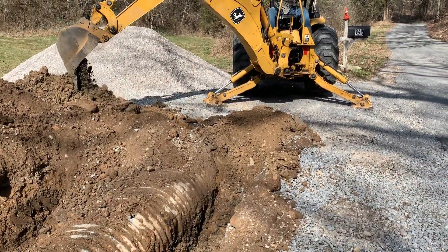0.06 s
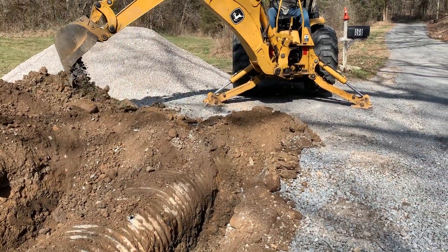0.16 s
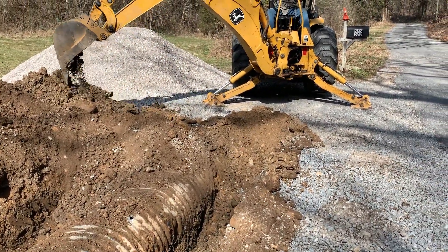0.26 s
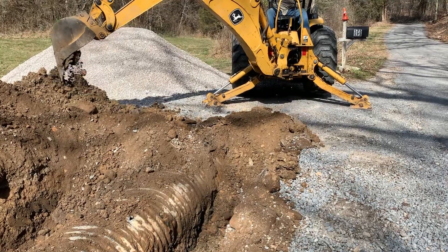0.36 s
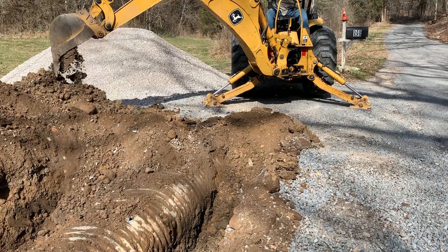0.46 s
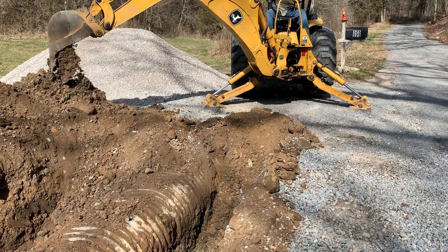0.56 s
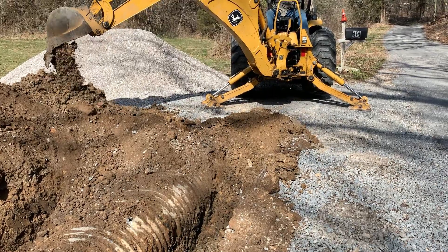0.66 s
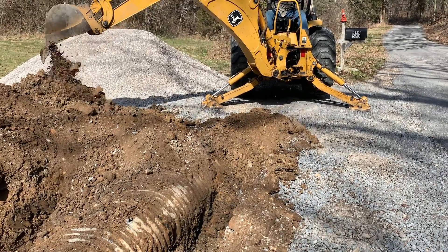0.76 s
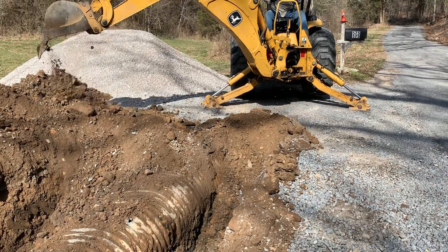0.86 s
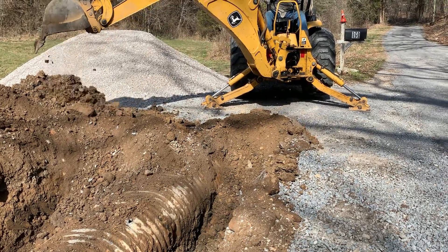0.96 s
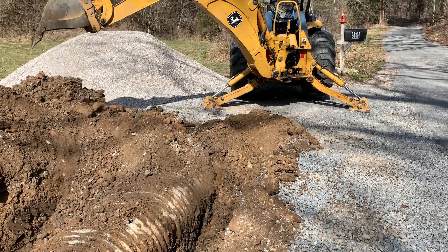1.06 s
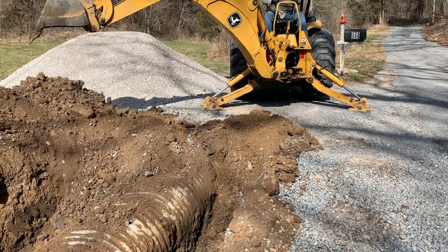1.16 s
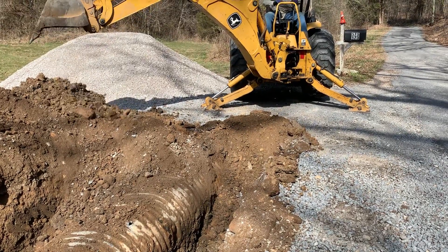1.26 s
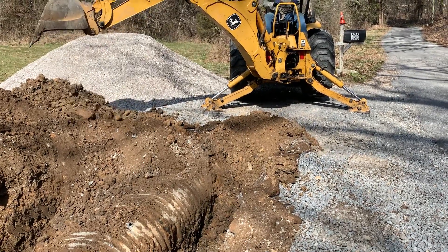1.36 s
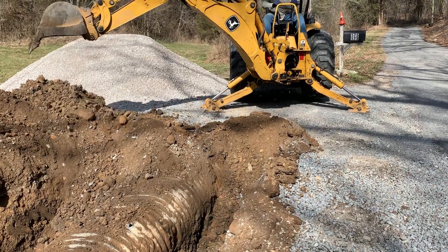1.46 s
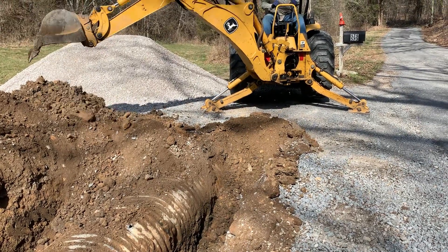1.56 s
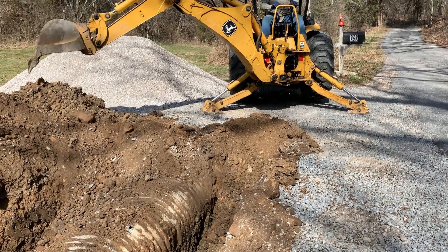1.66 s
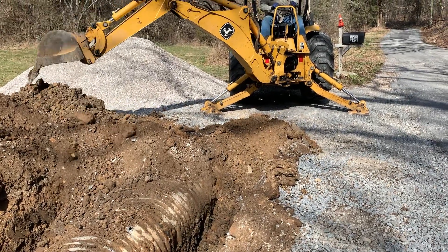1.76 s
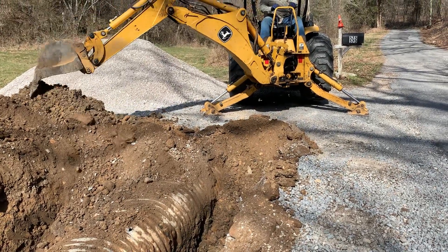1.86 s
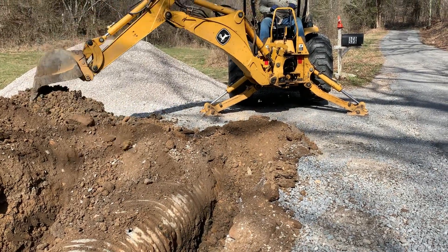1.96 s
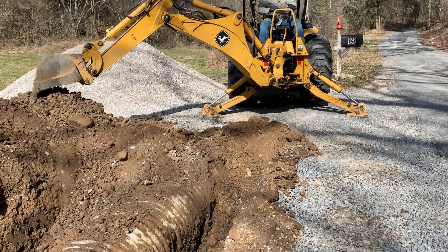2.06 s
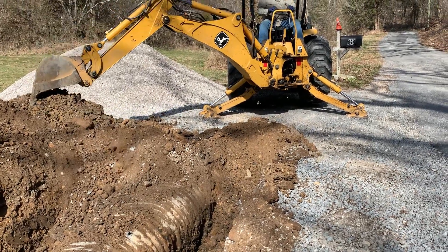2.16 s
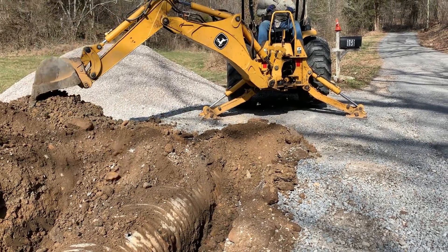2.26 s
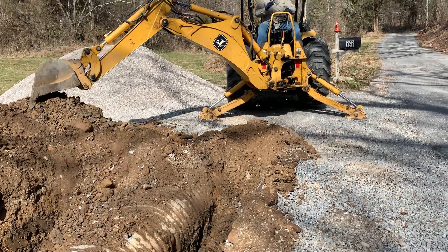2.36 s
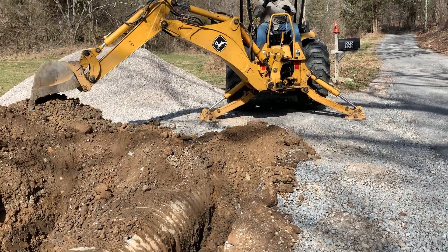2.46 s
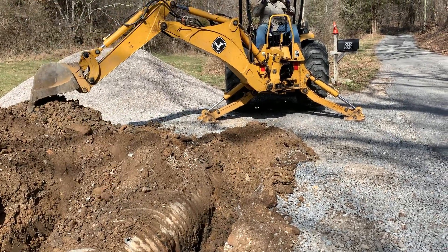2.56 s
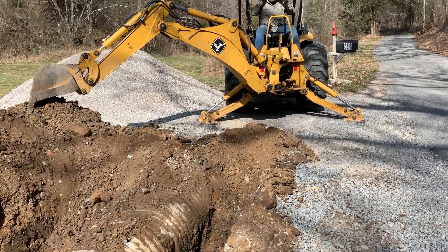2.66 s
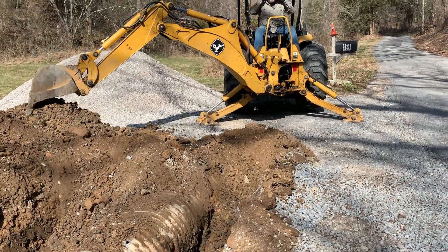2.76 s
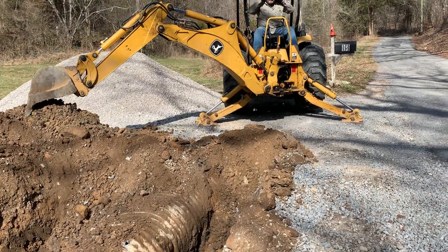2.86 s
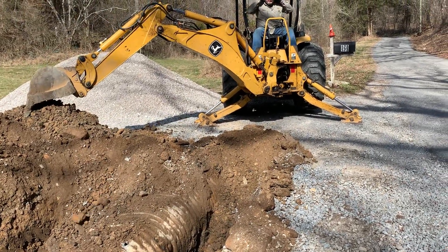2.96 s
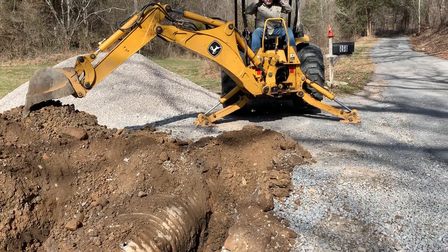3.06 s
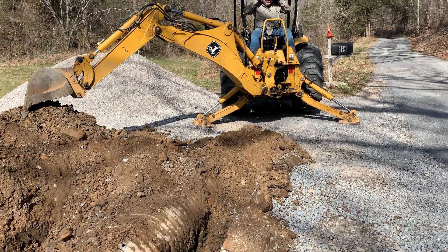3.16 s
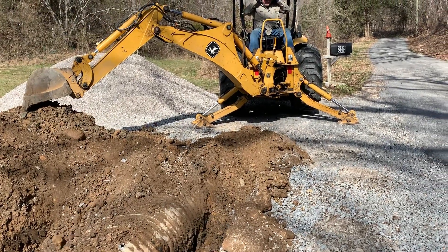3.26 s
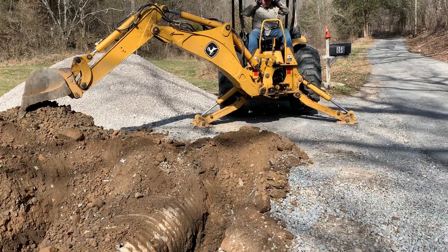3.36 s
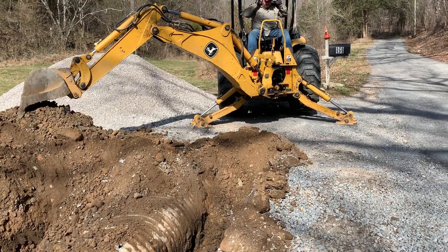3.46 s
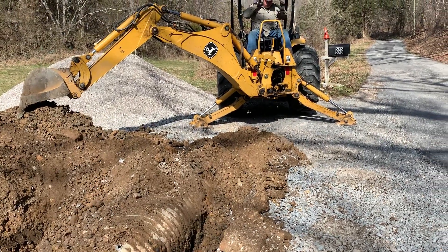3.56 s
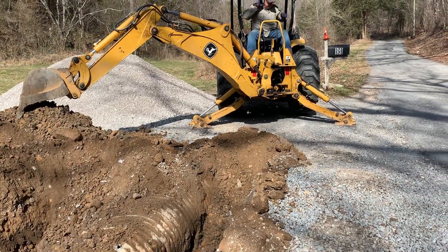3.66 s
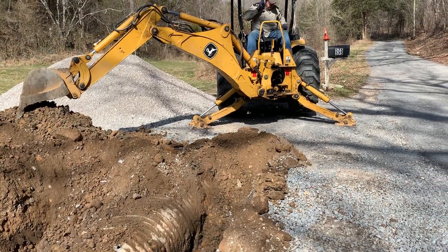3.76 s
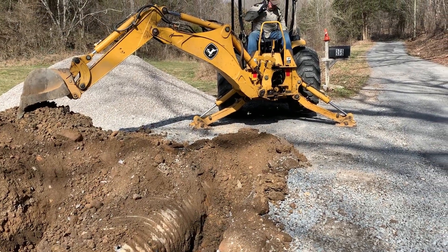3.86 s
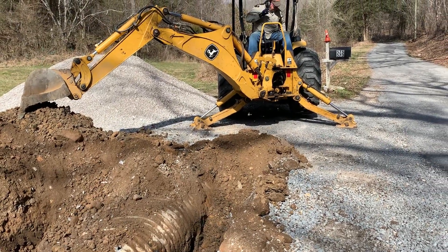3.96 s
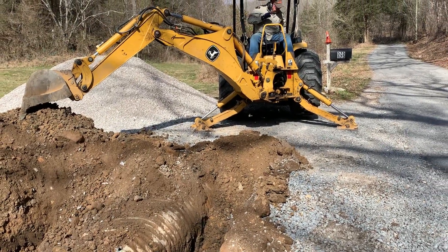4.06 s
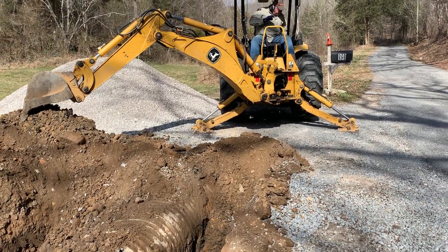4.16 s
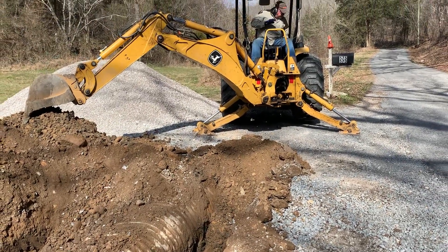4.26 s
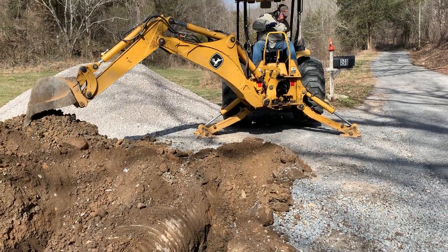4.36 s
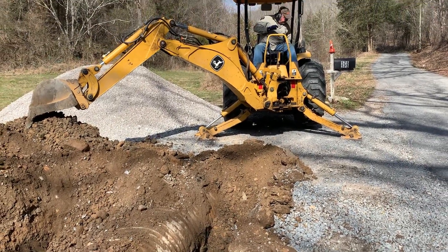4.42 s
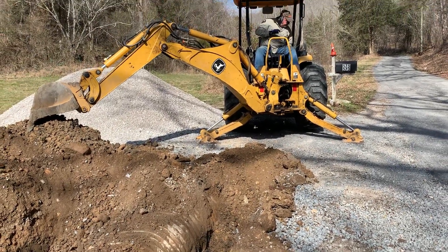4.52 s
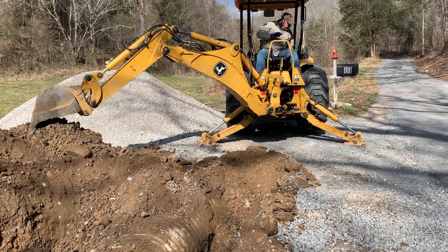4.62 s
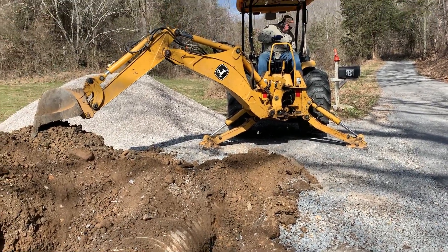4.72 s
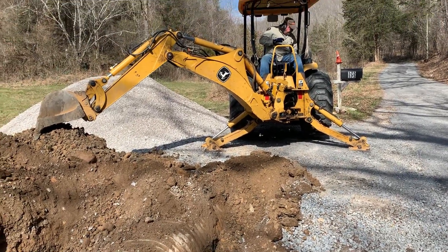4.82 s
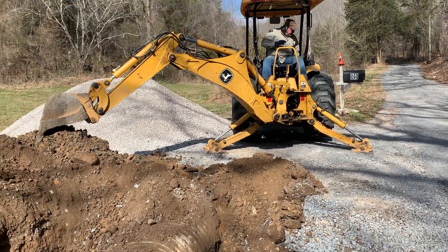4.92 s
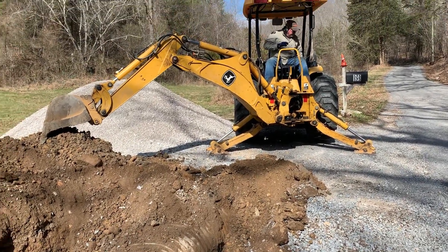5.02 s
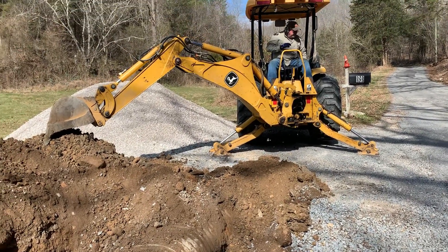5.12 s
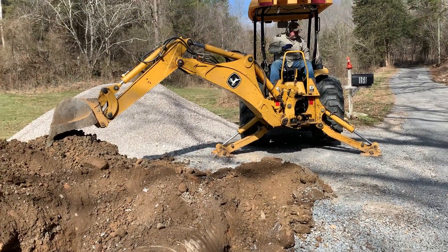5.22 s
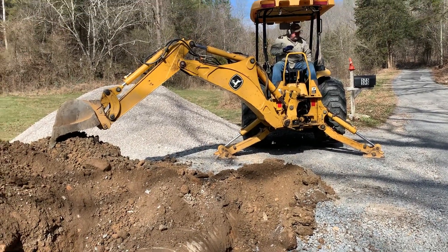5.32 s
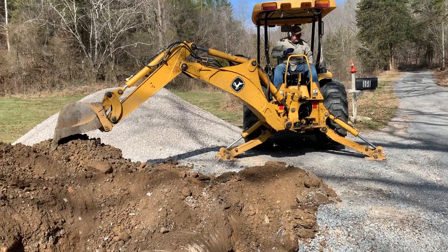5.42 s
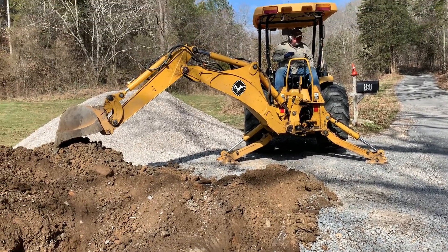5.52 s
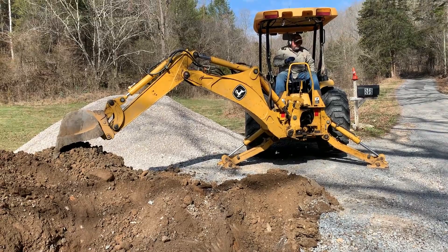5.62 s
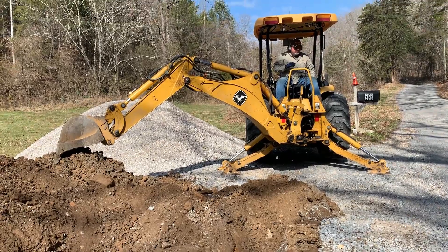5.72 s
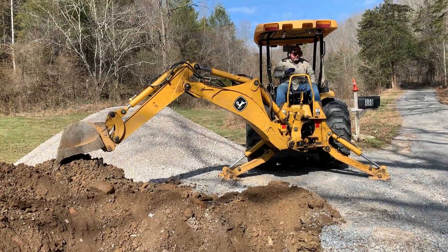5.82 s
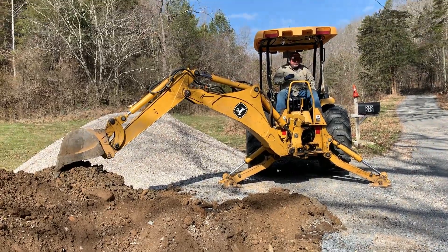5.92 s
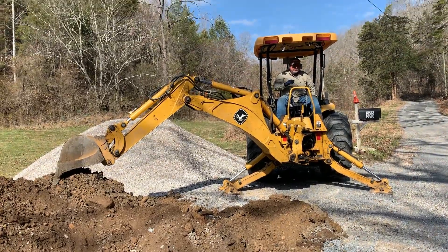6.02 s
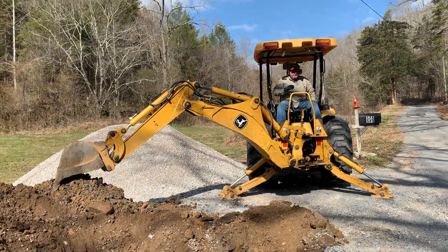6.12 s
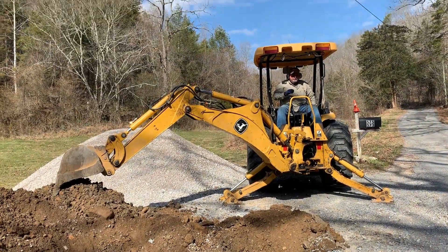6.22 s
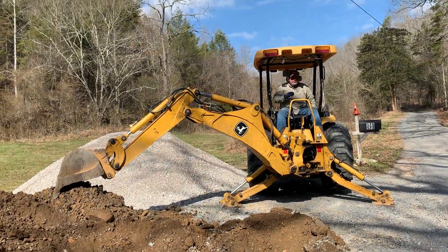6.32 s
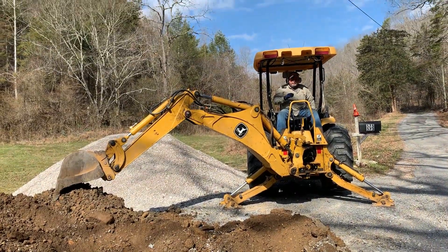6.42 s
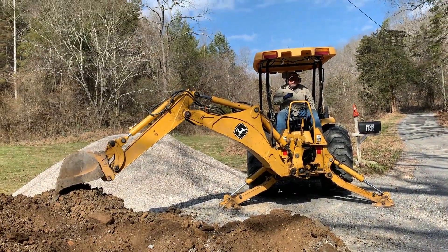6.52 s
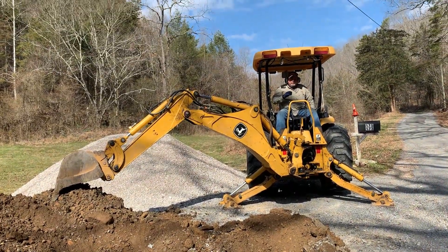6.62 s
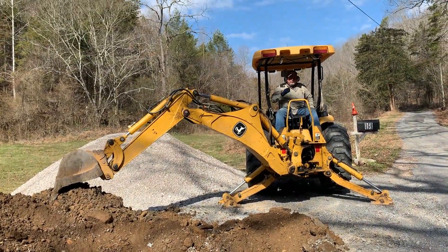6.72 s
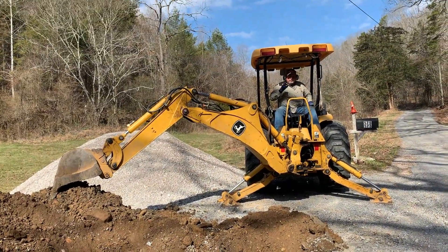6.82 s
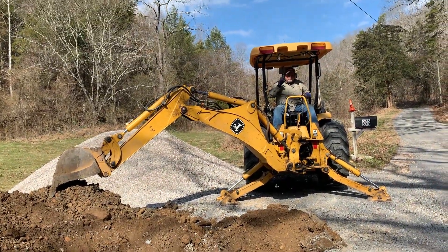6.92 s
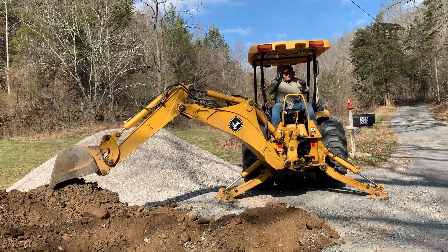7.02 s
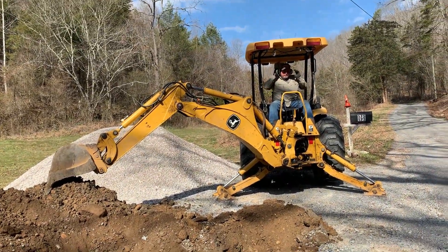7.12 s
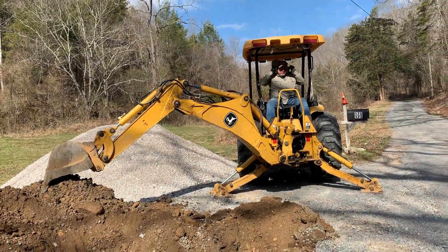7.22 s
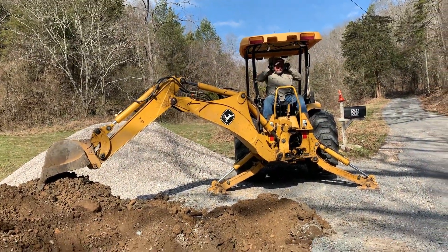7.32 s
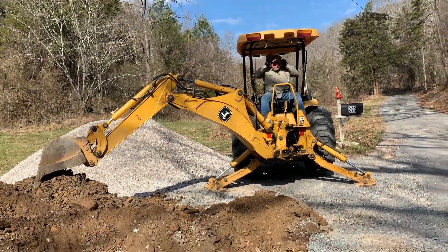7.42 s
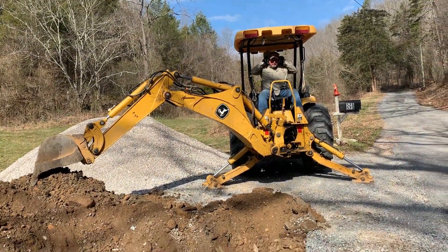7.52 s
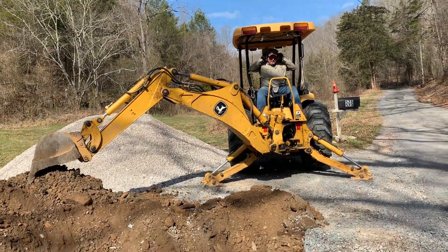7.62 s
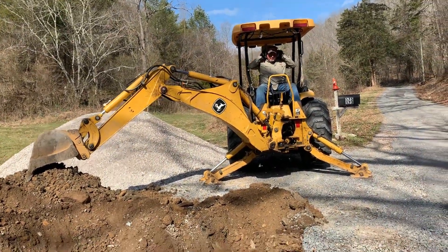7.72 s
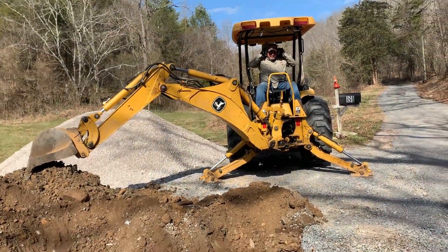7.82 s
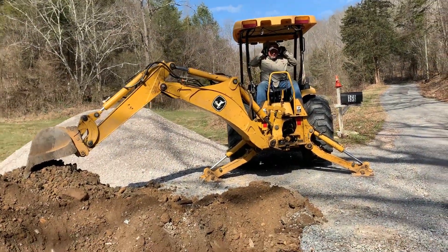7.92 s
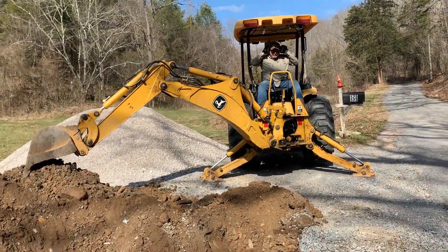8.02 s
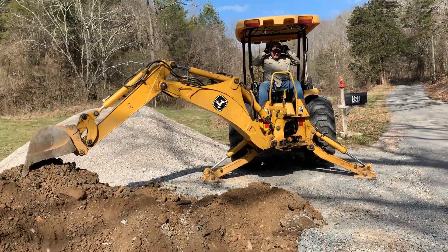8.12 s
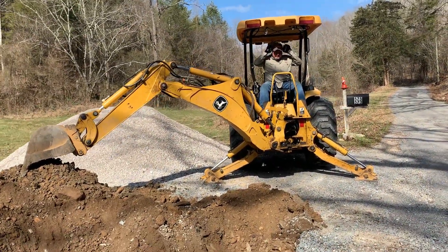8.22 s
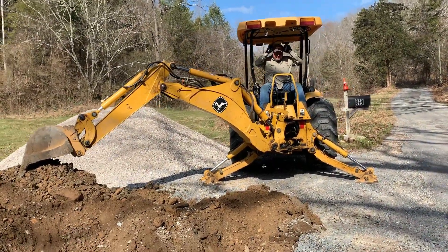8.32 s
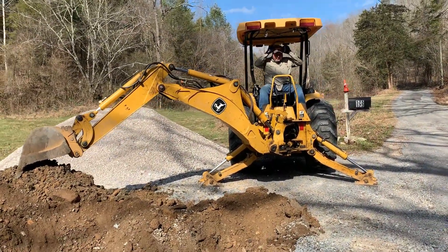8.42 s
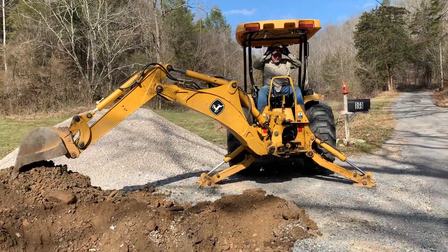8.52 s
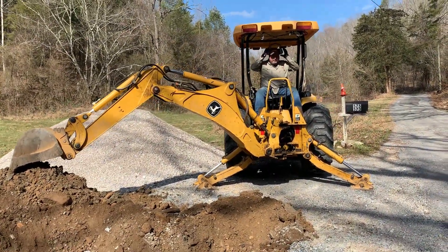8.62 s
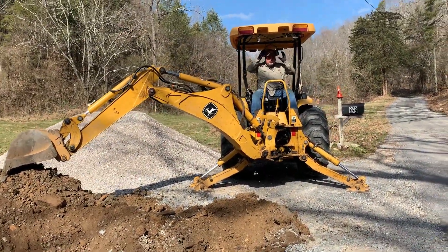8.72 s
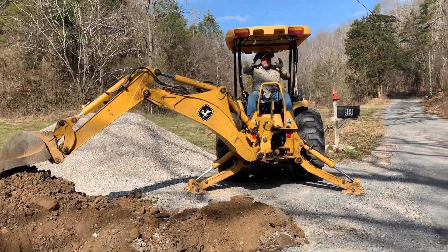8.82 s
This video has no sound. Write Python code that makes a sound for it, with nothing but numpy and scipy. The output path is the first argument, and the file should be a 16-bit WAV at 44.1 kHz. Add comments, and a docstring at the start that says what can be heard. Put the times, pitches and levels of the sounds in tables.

```python
"""Outdoors, a four-cylinder diesel digger works: soil pours, a valve hisses, the bucket knocks on the heap.
The throttle drops to idle, the fuel is cut and the engine slows until only ticks and quiet air are left.
Exhaust pulses pass through pipe resonances; timed contacts ring the block; blows ring the bucket steel.
Soil is random grains and clicks; air, valve and unsteady exhaust flow are coloured, flickering noise."""
import sys
import numpy as np
from scipy import signal
from scipy.io import wavfile
from scipy.ndimage import uniform_filter1d

SR = 44100
rng = np.random.default_rng(int(sys.argv[2]) if len(sys.argv) > 2 else 0)


def put_to_file(sound):
    """Save the sound as 16-bit audio at rate SR, in the file named by the first command-line argument."""
    columns = np.atleast_2d(sound).T  # one column per channel
    safe = np.clip(columns, -1, 1)
    whole_steps = np.round(safe * 32767)
    wavfile.write(sys.argv[1], SR, whole_steps.astype(np.int16))


def natural_amplitude(level_db):
    """Convert a level in decibels to a linear amplitude factor, elementwise."""
    exponent = np.asarray(level_db, float) / 20
    return 10 ** exponent


N = 391608   # length in samples

# Metal contacts in one four-firing engine cycle, with the pitch of the part struck
# columns: place_firings, part_hz, working_db, idle_db
CONTACTS = [(0, 1130, -1, -14), (.8, 390, -4, -4), (.2, 1100, -4, -14), (.3, 600, -5, -9),
            (.55, 1900, -6, -4), (.65, 1130, -7, 0), (1, 700, -5, -10), (1.2, 2300, -9, -12),
            (.57, 2800, -14, -6), (2.6, 2800, -12, -5), (1.5, 800, -3, -7), (1.55, 1950, -9, -4),
            (1.95, 1700, -5, -11), (2.2, 2000, -6, -12), (2.5, 850, -3, -6), (2.55, 2100, -12, -6),
            (2.7, 1900, -1, -5), (3.05, 1800, 0, -12), (3.1, 600, -4, -9), (3.45, 1830, -2, 3),
            (3.5, 780, -5, -2), (3.55, 2900, -6, -4), (3.8, 2100, -2, -8)]


def rms_one(x):
    """Scale to rms 1."""
    return x / np.sqrt(np.mean(x ** 2) + 1e-20)


def evened(x, seconds):
    """Divide out the slow changes of level."""
    size = int(seconds * SR)
    power = uniform_filter1d(uniform_filter1d(x ** 2, size), size)
    return x / np.sqrt(power + 1e-12)


def in_time(rows, outside=None):
    """Turn each column of a time table into a curve with one value a sample."""
    time_s, *columns = np.transpose(rows)
    return [np.interp(np.arange(N) / SR, time_s, c, outside, outside) for c in columns]


def at_hz(points, hz):
    """Read a table of values by pitch, on a log pitch axis."""
    table_hz, value = np.array(points).T
    return np.interp(np.log(hz), np.log(table_hz), value)


def cut(x, hz, kind, order=2):
    """Butterworth filter."""
    return signal.sosfilt(signal.butter(order, hz, kind, fs=SR, output="sos"), x)


def resonance(x, hz, width_hz):
    """Only the part of x that a resonance picks out."""
    return signal.lfilter(*signal.iirpeak(hz, hz / width_hz, SR), x)


def drift(rate_hz):
    """Slow random wandering of rms 1, made at every 40th sample and joined by lines."""
    r = np.exp(-80 * np.pi * rate_hz / SR)
    slow = signal.lfilter([1], [1, -2 * r, r * r], rng.standard_normal(N // 40 + 2002))
    slow = slow[2000:]   # skip the filter's start
    return np.interp(np.arange(N) / 40, np.arange(len(slow)), rms_one(slow))


def ring(clicks, hz, t60_s):
    """A unit click sets a sine of starting height 1 ringing, 60 dB down after t60_s."""
    r, w = natural_amplitude(-60 / (t60_s * SR)), 2 * np.pi * hz / SR
    return signal.lfilter([0, np.sin(w)], [1, -2 * r * np.cos(w), r * r], clicks + 1e-18)


def noise(spectrum, patchy_db, repeating=0, share=0):
    """Bands of stereo noise, each with its own level, flicker and left-right likeness; rms 1 overall."""
    # How alike the two sides are; columns: pitch_hz, likeness (1 same, 0 unrelated, negative opposed)
    likeness = [(60, 1), (130, -0.66), (290, 1), (640, 0.29), (1410, 0.64), (3100, 0.49), (6820, -0.046),
                (15000, -0.29)]
    repeating_top_hz = 2600   # the repeating part fades above this
    lowest, highest = spectrum[0][0], spectrum[-1][0]
    edges = np.geomspace(lowest, highest, 2 + int(2.5 * np.log2(highest / lowest)))
    out, white = 0, rng.standard_normal((2, 2, N))
    repeating = repeating + 0 * white
    for k, (low, high) in enumerate(zip(edges, edges[1:])):
        centre = np.sqrt(low * high)
        same = share / (1 + (low / repeating_top_hz) ** 2)
        # neighbouring bands take turns between two noise pairs
        source = np.sqrt(1 - same) * white[k % 2] + np.sqrt(same) * repeating[k % 2]
        mid, side = cut(source, [low, high], "band")
        alike = np.clip(at_hz(likeness, centre), -1, 1)
        gain = natural_amplitude(at_hz(spectrum, centre) + patchy_db * drift(30))
        out = out + gain * (np.sqrt(1 + alike) * mid + np.sqrt(1 - alike) * side * [[1], [-1]])
    return rms_one(out)


def bursts(rows):
    """Each (start_s, peak_db, pitch_hz, t60_s, width_octaves) row is dying noise in a band."""
    out, t = np.zeros(N + SR), np.arange(SR // 4) / SR
    grits = rng.standard_normal((len(rows), len(t)))
    for (start_s, peak_db, hz, t60_s, octaves), grit in zip(rows, grits):
        half = 2 ** (np.clip(octaves, .4, 5) / 2)
        t60_s = np.clip(t60_s, .003, .15)
        fade = natural_amplitude(-60 * t / t60_s) * np.tanh(t / t60_s / 0.0033)   # soft start, then dying away
        hit = cut(grit * fade, [hz / half, min(hz * half, 13000)], "band")
        start = round(start_s * SR)
        out[start:start + len(t)] += natural_amplitude(peak_db) * hit / np.abs(hit).max()
    return out[:N]


def quiet_air():
    """Steady outdoor air: noise whose bands wander strongly in level."""
    # Colour of the air; columns: pitch_hz, level_db (per Hz, relative)
    colour = [(18, -33), (30, 5), (85, 0.5), (243, -16), (443, -17), (897, -17), (5590, -51), (7080, -37),
              (7650, -33.5), (14000, -38.5), (15500, -37)]
    return natural_amplitude(-62.5) * noise(colour, patchy_db=6.0)


def ground(x):
    """A few dull echoes off ground and trees, with different delays at each ear."""
    # columns: left_delay_s, right_delay_s, level_db
    echoes = [(.0031, .0044, -8), (.0117, .0139, -16), (.029, .023, -20)]
    dull, out = cut(x, 6100, "low", order=1), np.zeros((2, N))
    for *delays, db in echoes:
        for side, delay_s in enumerate(delays):
            lag = round(delay_s * SR)
            out[side, lag:] += natural_amplitude(db) * dull[:N - lag]
    return out


def one_sample_late(x):
    """A source off to the right reaches the left port one sample later."""
    return np.array([np.roll(x[0], 1), x[1]])


def hydraulic_valve():
    """Oil squeezing through a valve hisses: treble noise that swells and fades."""
    # Strength of the hiss; columns: time_s, level_db (before the stereo mix)
    strength = [(1.31, -66), (1.396, -51), (1.662, -54), (1.904, -47), (2.06, -50), (2.2, -63)]
    # Colour of the hiss; columns: pitch_hz, level_db (per Hz, relative)
    colour = [(4120, -51), (7000, -29), (7410, -9.5), (9230, 2), (10600, -4.5), (11500, -21), (12700, -14),
              (15500, -17)]
    hiss = natural_amplitude(in_time(strength, outside=-100)[0]) * noise(colour, patchy_db=2.0)
    return 1.34 * hiss[0] + 0.19 * hiss   # a small source, nearly alike at both ports


def air_spit():
    """A sharp spit of air around the fuel cut: one short burst of treble noise."""
    return bursts([(6.505, -37, 10000, .06, .8)])


def soil():
    """Grains patter at random as the load slides out; pebbles and larger stones click."""
    # Soil sliding out; columns: time_s, level_db (of the patter before the stereo mix)
    pour = [(0.0, -52.5), (0.096, -51.5), (0.76, -45.5), (0.846, -39.5), (1.064, -49), (1.188, -50),
            (1.4, -57)]
    # Larger stones; columns: start_s, peak_db, pitch_hz
    stones = [(0.215, -32, 9800), (0.261, -39, 9450), (0.3534, -31.5, 8590), (0.5023, -25, 6200),
              (0.513, -23, 9350), (0.603, -29.5, 9800), (0.655, -32, 9030), (0.737, -31, 10200),
              (0.8897, -27, 4220), (0.91, -24, 9200), (0.983, -28, 9500), (1.255, -33.5, 5500),
              (2.2583, -35.5, 8500), (2.8006, -39, 9000), (3.3104, -39, 7500), (3.45, -32, 7900)]
    grains = natural_amplitude(4.6 * np.minimum(rng.exponential(1, (2, N)), 5)) * rng.choice([-1, 1], (2, N))
    grains *= rng.random(N) < 5000 * natural_amplitude(4.0 * drift(15)) / SR   # the grain rate wanders around 5000 a second
    patter = rms_one(cut(grains[0] + 0.27 * grains, [4500, 14000], "band", order=1))
    start_s, end_s, pebbles_per_s = .05, 1.28, 22
    loudest_db, spread_db, low_hz, high_hz = -36, 5.0, 4000, 11000
    draws = rng.random((round(pebbles_per_s * (end_s - start_s)), 3))
    pebbles = [(start_s + (end_s - start_s) * a, loudest_db + spread_db * np.log(b),
                low_hz * (high_hz / low_hz) ** c) for a, b, c in draws]
    clicks = bursts([(*row, .03, 1.3) for row in list(stones) + pebbles])
    return natural_amplitude(in_time(pour, outside=-100)[0]) * patter + clicks


def bucket():
    """Each blow is a short broad crunch of noise that also rings the steel."""
    # Bucket blows; columns: start_s, level_db, crunch_s (60 dB fall), ringing_db (relative to the crunch)
    knocks = [(0.248, -42, 0.067, 4.5), (0.328, -41, 0.14, 2.5), (1.881, -32.5, 0.18, -6.5),
              (1.911, -32, 0.12, -4), (1.939, -36, 0.69, -9.5), (2.011, -36, 0.13, -2.5),
              (2.028, -29, 0.12, -2.5), (2.048, -34, 0.078, -7), (2.079, -35.5, 0.25, -6)]
    # Notes of the steel; columns: pitch_hz, level_db (relative), t60_s
    steel = [(209, 4, 0.057), (257, -5, 0.27), (328, -4.5, 0.12), (362.7, 0.5, 0.12), (617, -2, 0.061),
             (774, -1, 0.16), (884, -9, 0.042), (1073, -1, 0.083), (1180, -4, 0.062), (1457, -21, 0.06),
             (1937, -11, 0.071)]
    t, out, crunch, ringing = np.arange(N) / SR, 0, 0, 0
    for start_s, db, crunch_s, ringing_db in knocks:
        blow = (t >= start_s) * natural_amplitude(db - 60 * np.abs(t - start_s) / crunch_s)
        crunch, ringing = crunch + blow, ringing + natural_amplitude(ringing_db) * blow
    for hz, db, t60_s in steel:
        out = out + ring(natural_amplitude(db - 27.5) * ringing * rng.standard_normal(N), hz, t60_s)
    grit = cut(crunch * rng.standard_normal(N), [450, 1600], "band", order=1)
    return out + natural_amplitude(0.5) * cut(grit, 9800, "low")


def linkage_clack():
    """The linkage clacks once: a brief burst of noise in a band."""
    # columns: start_s, peak_db, pitch_hz, t60_s, width_octaves
    clack = (2.487, -29, 1000, .06, 1.8)
    return bursts([clack])


def stopping():
    """Broad chuffs of the last strokes, narrow ticks of parts coming to rest, a thud of the block."""
    # Last strokes; columns: start_s, peak_db
    chuffs = [(7.427, -45), (7.517, -49), (7.645, -49), (7.728, -51.5), (7.799, -57), (7.89, -49.5),
              (7.962, -46), (8.329, -57), (8.589, -49.5)]
    # Parts settling; columns: start_s, peak_db, pitch_hz, t60_s
    ticks = [(7.95, -45, 1270, 0.032), (7.828, -48, 1160, 0.023), (8.096, -42.5, 1550, 0.14),
             (8.184, -65, 1500, .04), (8.249, -53.5, 1350, 0.04), (8.32, -57, 1930, .1),
             (8.462, -55, 1720, 0.12), (8.531, -42, 1300, .014), (8.575, -54, 2960, .04)]
    # The block rocks on its mounts; columns: start_s, peak_db, pitch_hz, t60_s, width_octaves
    thud = (8.108, -47, 520, .15, 1.5)
    chuff_hz, chuff_t60_s, chuff_octaves, tick_octaves = 1150, .11, 2.6, 1.0
    broad = [(*row, chuff_hz, chuff_t60_s, chuff_octaves) for row in chuffs]
    narrow = [(*row, tick_octaves) for row in ticks]
    return bursts(broad + narrow + [thud])


def throb(firings, working, fuel):
    """Air and rubbing swell once a firing, more deeply at low speed."""
    # Combustion roar, one value for each cylinder in turn; column: level_db
    roar_db = [3, 4, 6.5, 8.5]
    since = firings - .42
    turn = since % 1
    swell = natural_amplitude(np.array(roar_db)[since.astype(int) % 4]) * turn * np.exp(1 - turn / 0.22) / 0.34
    return evened(0.5 + 0.45 * fuel + 2.6 * working + swell, 0.1)


def each_turn(firings):
    """White noise repeating every two crank turns (four firings), the second turn much like the first."""
    first, other = rng.standard_normal((2, 2, 2, SR // 26))
    pattern = np.concatenate([first, .8 * first + .6 * other], axis=-1)
    return pattern[..., (firings / 4 % 1 * pattern.shape[-1]).astype(int)]


def air_rush(firings, working, fuel, burning, swell, clatter_db):
    """Fan and intake air: noise that throbs with the firings and partly repeats with the crank."""
    # Colour of the rush; columns: pitch_hz, level_db (per Hz, relative)
    colour = [(120, -24.5), (200, -2), (392, -24.5), (471, -28), (575, -17), (1150, -15.5), (1260, -26.5),
              (1840, -15.5), (2750, -27.5), (3610, -23), (7220, -34.5), (9830, -44), (11600, -90),
              (12700, -79), (15500, -69)]
    mean_db = np.average(clatter_db, weights=working)
    level_db = -43.5 + 0.93 * (clatter_db - mean_db)   # follows most of the clatter's swing
    level_db = level_db - 2 * burning * (1 - working)   # the clatter stands out more at idle
    share = .6 * working * fuel   # part of the low rush's power that repeats
    rush = noise(colour, patchy_db=2.0, repeating=each_turn(firings), share=share)
    rush = natural_amplitude(level_db) * swell * rush * natural_amplitude([[-1.2], [1.2]])
    # the fan is brighter at speed
    return rush + (natural_amplitude(7.8 * working * fuel) - 1) * cut(rush, 8030, "high")


def whines(firings, working, fuel):
    """Pump and gear tones: sines locked to the engine speed, fading out with speed and fuel."""
    # columns: multiple of the firing rate, level_db (relative to the clatter)
    tones = [(3.51, 5), (6.75, -13), (7, -9), (7.25, -17.5), (7.5, -11), (11, -4), (12.5, -15), (13.5, -14),
             (15, -14), (18, -14), (48, -19), (56.5, -19), (60, -21), (68, -24), (78, -22), (102, -19),
             (114, -20)]
    return sum(natural_amplitude(db) * np.sin(2 * np.pi * k * firings) for k, db in tones) * working * fuel


def contact_times(firings):
    """Sample number of every contact in every cycle, shape (cycles, contacts), with slight jitter."""
    places = 4 * np.arange(int(firings[-1] / 4))[:, None] + np.array(CONTACTS)[:, 0]
    return np.searchsorted(firings, places + rng.normal(0, .0012, places.shape))


def clatter(at, working, fuel, swell):
    """The same contacts strike the block every cycle; without fuel the blows give way to rubbing."""
    # Notes of engine block and panels; columns: pitch_hz, level_db (relative)
    block = [(385, 1.5), (585, -1.5), (700, -17), (800, 1), (950, -12), (1130, 1), (1450, -13),
             (1690, -8.5), (1820, 3.5), (1900, -3), (2010, 1.5), (2232, -19), (2560, 4), (2980, 2),
             (3600, -25), (4150, 3.5), (5200, -8)]
    _, part_hz, work_db, idle_db = np.transpose(CONTACTS)
    blows = fuel[at] * natural_amplitude(working[at] * work_db + (1 - working[at]) * idle_db)
    rubbing, out = natural_amplitude(-31.5) * (1.1 - fuel) * swell, np.zeros(N)
    for hz, db in block:
        near = np.exp(-(np.log2(hz / part_hz) / .22) ** 2) + .04   # a part mostly rings notes near its own
        clicks = rubbing * rng.standard_normal(N)
        np.add.at(clicks, at, blows * near * (1 + .12 * rng.standard_normal(at.shape)))
        short = ring(natural_amplitude(db) * hz * clicks, hz, 16 / hz)
        out += ring(short, hz, 37 / hz)   # a short ring feeds a longer one: the knock starts softly
    panel = ring(rng.standard_normal(N), 2234, 0.12)   # one thin panel sings on its own note
    return evened(out, 0.1) + natural_amplitude(-15.0) * fuel * rms_one(panel)


def exhaust(firings, speed, working, fuel):
    """One blow-down pulse a firing, varied by cylinder and ragged without fuel, through the pipe."""
    # Differences between cylinders; columns: level_db, lateness_firings
    cylinders = [(0.5, -0.049), (1, -0.022), (1, -0.017), (0, -0.038)]
    # Exhaust resonances; columns: pitch_hz, width_hz, level_db
    pipe_notes = [(50.5, 24.2, 25.5), (96, 22, 4), (162.3, 41, 8), (179, 22, -2)]
    count = np.arange(1, int(firings[-1]))
    db, late = np.array(cylinders)[count % 4].T
    now = np.searchsorted(firings, count)
    ragged = 1 + 2.5 * (1 - fuel[now])
    late = late + 0.277 * (fuel[now] == 0) - 0.358 * working[now]
    at = np.searchsorted(firings, count + late + ragged * rng.normal(0, 0.0051, len(count)))
    pulses = np.full(N, 1e-18)
    pulses[at] = -natural_amplitude(db + ragged * rng.normal(0, 0.25, len(count)))
    # a weaker push runs ahead at low speed
    pulses += natural_amplitude(-8.5) * (1 - working) * np.roll(pulses, -round(0.0105 * SR))
    body = cut(cut(pulses, 145.7, "low", order=4), 37.6, "high", order=3)
    for hz, width_hz, db in pipe_notes:
        body = body + (natural_amplitude(db) - 1) * resonance(body, hz, width_hz)
    overrun = (1 - fuel) * np.clip(fuel / .3, 0, 1)   # strongest when fuel is low but not off
    bark_hz, bark_width_hz, bark_db = 172, 55, 12   # the pipe barks brighter while the throttle is shut
    body = body + natural_amplitude(bark_db) * overrun * resonance(body, bark_hz, bark_width_hz)
    slow = np.clip((24 - speed) / 10, 0, 1)   # slow strokes puff duller and at last die out
    body = (1 - slow) * body + slow * cut(body, 115, "low")
    return evened(body, .25) * np.clip((speed - 7) / 5, 0, 1)


def exhaust_pipe(firings, speed, working, fuel, burning, exhaust_db):
    """Exhaust pulses with an unequal ground echo, plus the rumble of unsteady flow."""
    # Unsteady exhaust flow; columns: pitch_hz, level_db (per Hz, relative)
    rumble = [(25, -35), (45, -12), (80, -5.5), (130, 4), (190, 0), (260, -8.5), (330, -16)]
    work_db, idle_db, overrun_db, coast_db = -12.5, -20, -14, -11   # flow relative to the pulses
    unsteady_db = (1 - burning) * np.where(fuel > 0, overrun_db, coast_db)   # even firing steadies the flow
    unsteady_db = unsteady_db + burning * (working * work_db + (1 - working) * idle_db)
    pulses = exhaust(firings, speed, working, fuel)
    echo = natural_amplitude(-15.0) * np.roll(pulses, round(0.0042 * SR)) * [[1], [-1]]   # opposite sign on the right
    flow = noise(rumble, patchy_db=1.0)
    flow = 0.52 * flow[0] + 0.48 * flow   # long waves, much alike at both ports
    return natural_amplitude(exhaust_db) * (pulses * natural_amplitude([[.3], [-.3]]) + echo + natural_amplitude(unsteady_db) * flow)


def scene():
    """Metal and air rush lean right; soil, valve and spit reach the left late; quiet air surrounds them."""
    # Engine speed; columns: time_s, firings_per_s
    speed_curve = [(0, 52.12), (1.3, 52.49), (1.55, 53.1), (2.5, 52.91), (4.53, 52.87), (4.6, 51.9),
                   (4.8, 45.25), (5.4, 30.38), (5.53, 28.1), (5.75, 29.7), (6, 30.26), (6.6, 30.0),
                   (6.7, 27.5), (7.2, 16.7), (7.4, 11.6), (8, 7), (8.9, 3)]
    # Fuel supply; columns: time_s, share (0 to 1)
    fuel_curve = [(0, 0.7), (4.54, 1), (4.62, 0.18), (5.48, 0.63), (5.53, 0.95), (6.55, 0.87), (6.6, 0),
                  (8.9, 0)]
    # Engine levels; columns: time_s, exhaust_db, clatter_db
    engine_levels = [(0.0, -30, -52), (1.8, -26, -49.5), (3.75, -22.5, -45.5), (4.55, -22, -46),
                     (4.72, -25, -51), (4.97, -26.5, -52.5), (5.2, -31, -53), (5.46, -33, -54),
                     (5.56, -31, -47.5), (6.55, -30.5, -49.5), (6.63, -34.5, -55.5), (7.05, -40.5, -57.5),
                     (7.25, -45, -59), (8.01, -62, -75), (8.43, -50, -76.5), (8.71, -58, -79.5),
                     (8.88, -68, -86)]
    (speed,), (fuel,) = in_time(speed_curve), in_time(fuel_curve)
    exhaust_db, clatter_db = in_time(engine_levels)
    firings = .285 + np.cumsum(speed) / SR   # running count of firings
    working = np.clip((speed - 32) / 18, 0, 1)   # 1 at working speed, 0 at idle and below
    burning = np.clip((fuel - .6) / 0.54, 0, 1)
    swell = throb(firings, working, fuel)

    air = quiet_air()
    right = one_sample_late(hydraulic_valve() + soil() + air_spit())
    rush = air_rush(firings, working, fuel, burning, swell, clatter_db)
    engine = clatter(contact_times(firings), working, fuel, swell) + whines(firings, working, fuel)
    metal = natural_amplitude(clatter_db) * engine + bucket() + linkage_clack() + stopping()
    pipe = exhaust_pipe(firings, speed, working, fuel, burning, exhaust_db)
    return metal * natural_amplitude([[-1.5], [1.5]]) + ground(metal) + pipe + rush + right + air


def top_cut(x):
    """Nothing passes above the cut-off."""
    return signal.sosfilt(signal.butter(12, 15880, fs=SR, output="sos"), x)


def record(dry):
    """Two treble dips, near 7.1 and 11.7 kHz, and a duller top."""
    for hz, q in [(7100, 4.06), (11700, 9.0)]:
        dry = 0.21 * dry + 0.75 * signal.lfilter(*signal.iirnotch(hz, q, SR), dry)
    return top_cut(cut(dry, 14000, "low"))


dry = scene()
out = record(dry)
put_to_file(out)
```